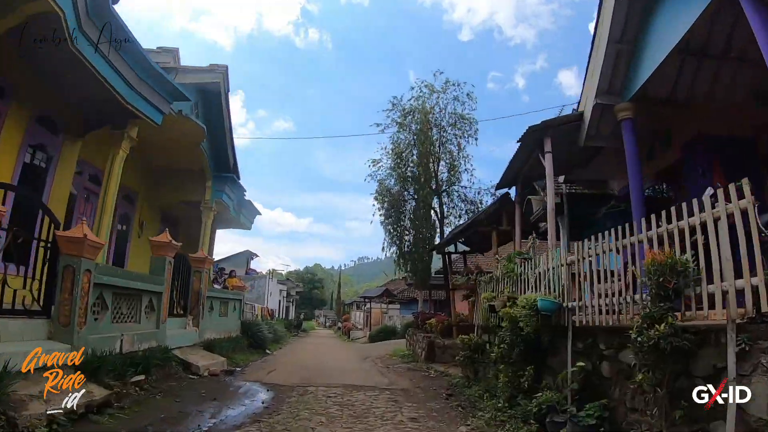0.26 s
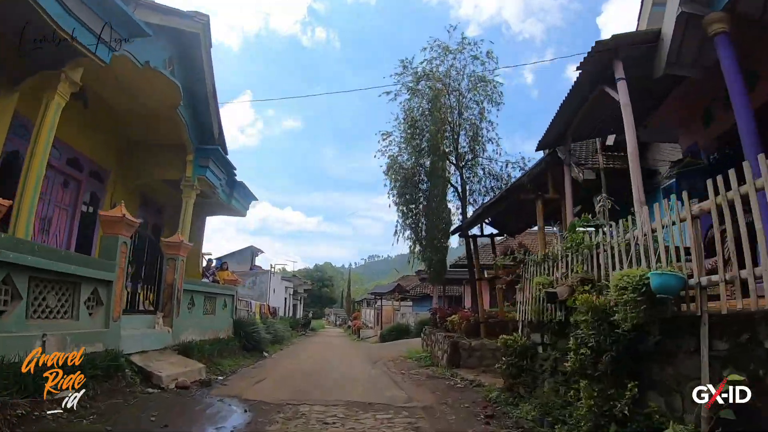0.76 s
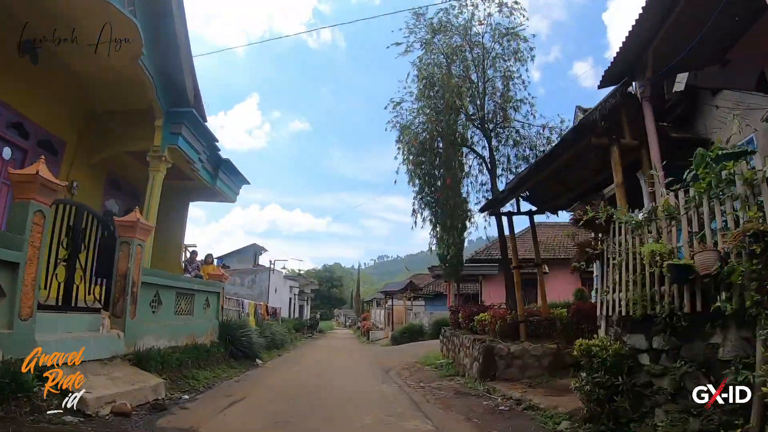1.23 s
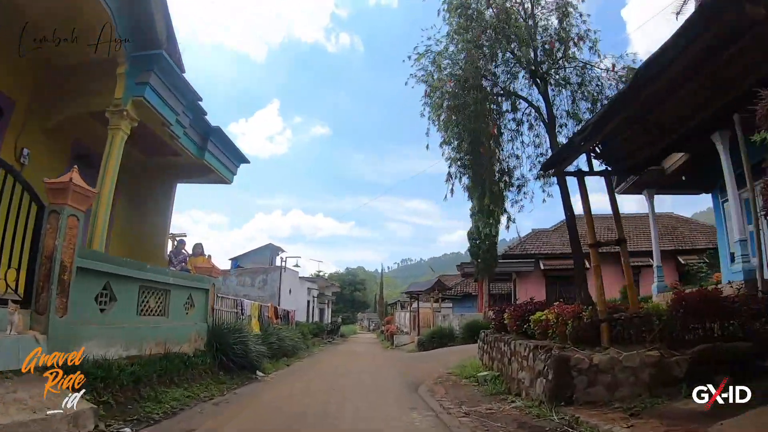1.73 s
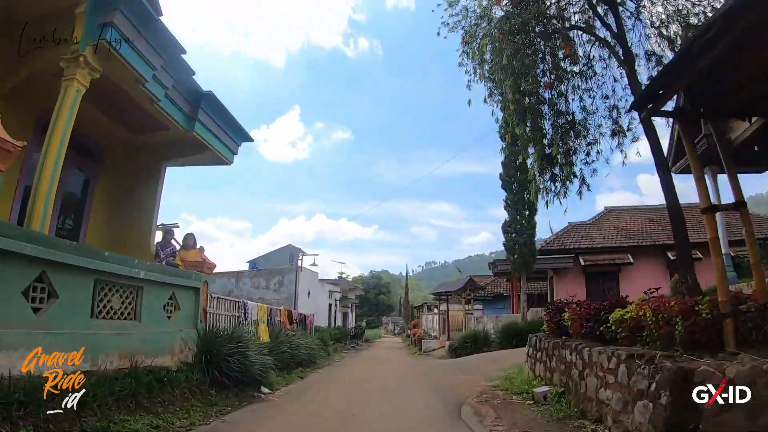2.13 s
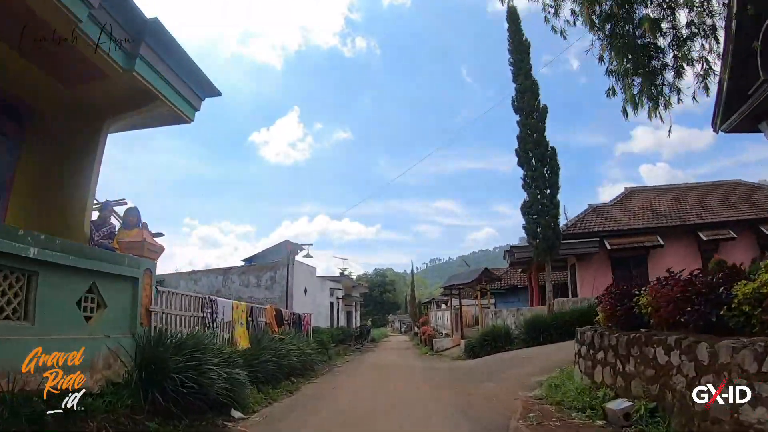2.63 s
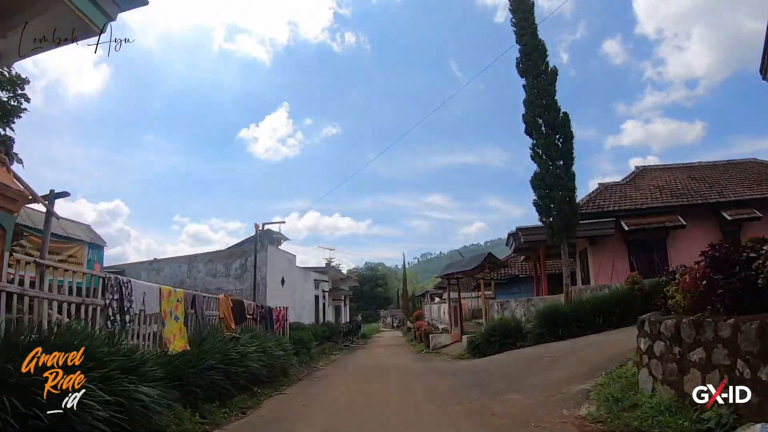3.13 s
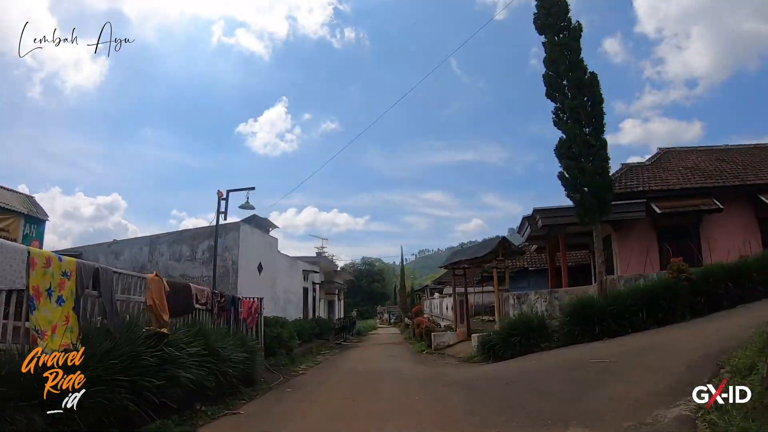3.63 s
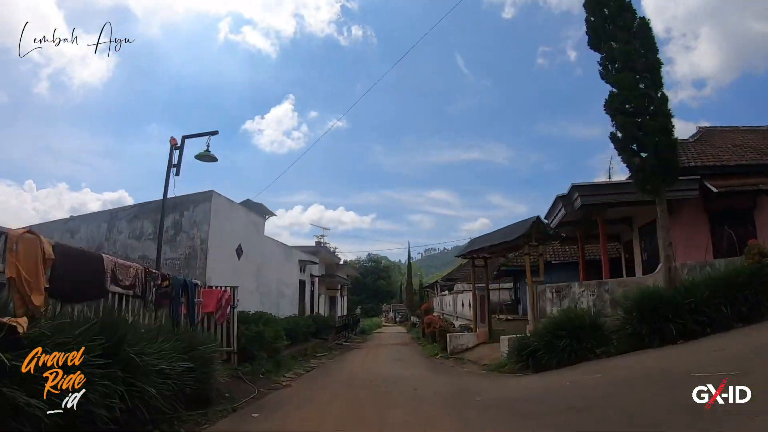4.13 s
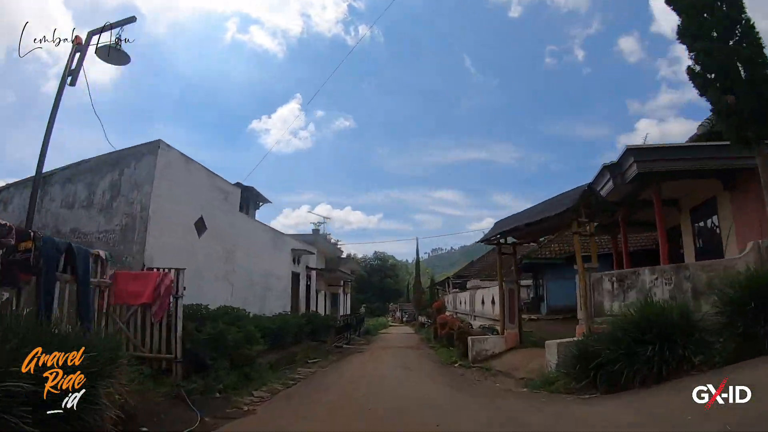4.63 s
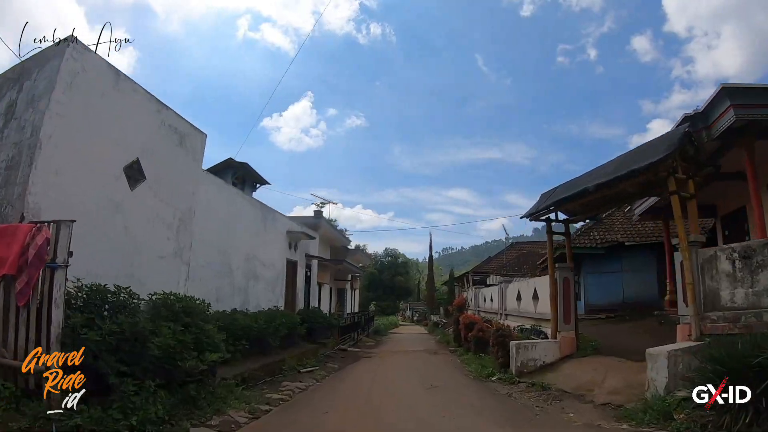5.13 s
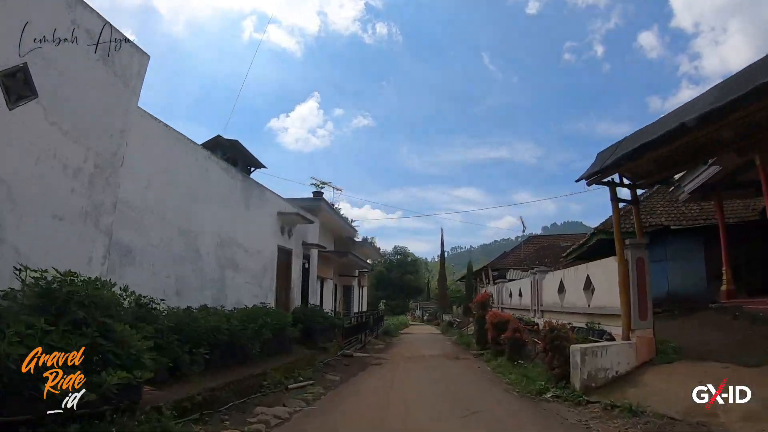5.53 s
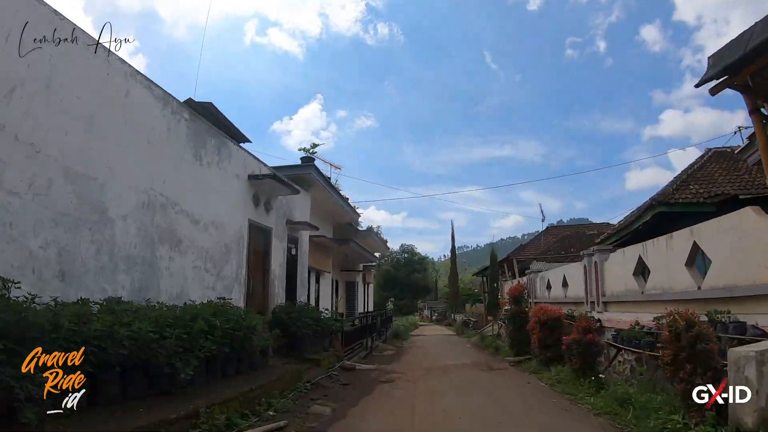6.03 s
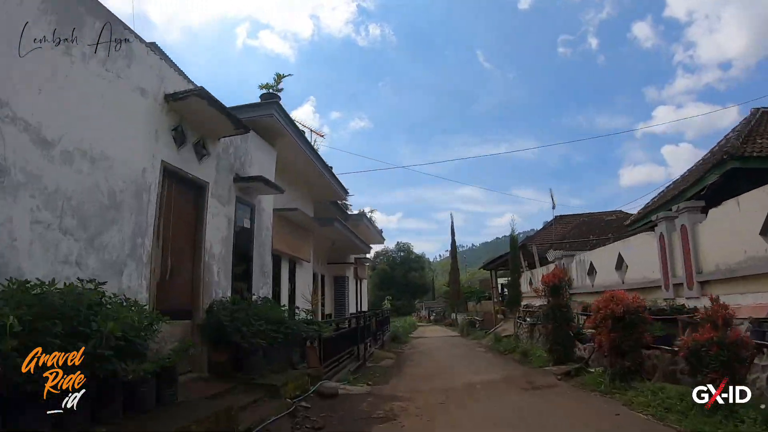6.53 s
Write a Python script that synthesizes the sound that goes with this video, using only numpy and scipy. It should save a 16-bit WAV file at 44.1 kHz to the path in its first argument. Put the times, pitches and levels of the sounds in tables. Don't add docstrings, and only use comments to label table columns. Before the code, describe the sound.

A bicycle coasts down a rough lane, wind and cobbles thumping the microphone, tyres roaring over grit while the freewheel ticks rapidly and buzzes.

```python
import sys
import numpy as np
from scipy import signal
from scipy.fft import rfft, irfft
from scipy.io import wavfile
from scipy.ndimage import uniform_filter1d

SR = 44100
rng = np.random.default_rng(int(sys.argv[2]) if len(sys.argv) > 2 else 0)


def master_out(mix):
    frames = np.transpose(np.atleast_2d(mix))
    ceiling = np.clip(frames, -1, 1)
    pcm = np.round(ceiling * 32767).astype(np.int16)
    wavfile.write(sys.argv[1], SR, pcm)


def volts_from_db(level):
    exponent = np.asarray(level, float) / 20
    return 10 ** exponent


N = 298998

# time_s, buffeting_db
WIND = [(0, -18.5), (.45, -13.5), (.8, -18.5), (1.15, -20.5), (1.55, -16), (2.1, -15.5), (2.5, -21),
        (2.8, -23), (3.4, -26), (3.8, -29.5), (4.3, -25), (4.5, -20.5), (4.8, -21.5), (5.1, -14.5),
        (5.5, -13.5), (5.85, -17.5), (6.2, -22.5), (6.78, -15.5)]
# freq_hz, density_db
BUFFET_SPECTRUM = [(3, -34), (8, 8), (25, -6), (76, 6), (120, -3), (135, -7.5), (165, -31), (250, -23.5),
                   (420, -30.5), (800, -57.5), (1500, -94)]
# freq_hz, gain_db
BUFFET_TONE = [(15, 1), (35, 5.5), (50, -0.15), (126, -0.2), (142, -2), (175, -4), (215, 3.3)]
# middle_s, half_length_s, thump_db, rattle_db
JOLTS = [(0.214, 0.061, 8, 5.5), (.31, 0.15, 7, 12), (0.525, 0.029, 6, 5), (0.659, 0.07, 10, 11.5),
         (0.773, 0.094, 4, 6.5), (1.012, 0.2, 10, 6.8), (1.301, 0.098, 12, 12.5), (1.391, 0.082, 7.5, 8.5),
         (1.666, 0.039, 4.5, -2.5), (1.686, 0.092, 5, 10.5), (1.854, 0.11, 2.8, 7.5),
         (1.924, 0.018, -0.5, 7.5), (1.993, .11, 3.5, 14.5), (2.181, 0.043, 5, 7.5),
         (2.287, 0.083, 1.7, 5.5), (2.542, 0.029, -1.5, -2), (2.87, 0.1, 6.5, .3), (4.042, 0.16, 0.5, 0.5),
         (4.7, .08, 3, -2.2), (5.267, 0.32, -5, 2), (5.955, 0.15, 8.5, 3.5), (6.092, 0.027, 14.5, 1.5),
         (6.358, 0.38, 7.5, 0), (6.747, 0.043, 5, 1.5)]

# pitch_hz, width_hz, level_db
DRONE_MODES = [
    (114.3, 9.3, 6.5),
    (91.9, 25, -5),
]
# start_s, length_s, level_db
BOUNCES = [(0.013, 0.11, -11), (0.262, 0.14, -13.5), (.62, .11, -15.5), (0.752, .13, -12.5),
           (1.207, .08, -14.5), (1.69, .07, -15.5), (1.846, .04, -15), (1.96, 0.035, -12),
           (2.065, .1, -15.5), (2.52, 0.03, -14), (2.693, 0.084, -13), (2.99, 0.081, -14.5),
           (3.14, .076, -14.5), (3.402, .044, -13), (3.542, .043, -15), (3.72, 0.11, -13.5),
           (4.015, .12, -10.5), (4.182, .11, -10), (4.397, 0.13, -12.5), (4.523, 0.073, -11),
           (4.664, 0.066, -12), (4.85, .12, -12.5), (5.022, .04, -15), (5.127, 0.11, -8.5),
           (5.307, 0.097, -4.5), (5.592, .084, -14), (5.745, 0.15, -15), (5.919, 0.13, -11.5),
           (6.493, .042, -13.5), (6.59, .1, -10)]
# freq_hz, gain_db
DRONE_TOP_CUT = [(124, -1.5), (138, 0), (160, -38.5), (300, -40)]

# time_s, roar_db, brightness_db
GROUND = [(0, -29, 6), (.45, -34, 5), (1.2, -34.5, 6.5), (1.55, -32, 0), (2.1, -32, 3.5), (2.62, -32, 1),
          (3.3, -29, 5), (3.9, -24, 6), (4.4, -25, 6.5), (5.05, -24.5, 5), (5.49, -24, 3),
          (6.2, -24.5, 3.5), (6.78, -25.5, 4)]
# freq_hz, density_db
ROAR_SPECTRUM = [(88, -60), (150, -10), (168, -17), (230, 7), (335, -4), (406, 4.5), (508, -4), (1000, -10),
                 (1110, -15), (1230, -8.5), (1320, -30.5), (1440, -10), (1700, -21), (2210, -20),
                 (3740, -120)]
# freq_hz, density_db
RATTLE_SPECTRUM = [(88, -28), (150, 2.5), (360, -6.5), (487, -4.5), (762, -23), (1010, -34), (1210, -9.5),
                   (1830, -16.5), (1960, -16), (3010, -17), (6490, -33.5), (8640, -37), (10700, -47.5),
                   (13900, -76), (22000, -120)]

# start_s, peak_db, pitch_hz, crack_db, ring_s
KNOCKS = [(0.199, -19, 444, -1, 0.02), (0.269, -20, 466, -3, 0.036), (0.533, -28, 600, 6, 0.04),
          (0.669, -21, 444, 2, 0.031), (0.686, -13.5, 700, -23, 0.031), (0.78, -20, 401, -18, 0.062),
          (1.252, -27, 495, -15, 0.04), (1.314, -10, 458, -11, 0.056), (1.353, -11.5, 522, -14, 0.066),
          (1.387, -14.5, 720, -17, 0.02), (1.693, -11, 480, -15, 0.03), (1.742, -16, 431, -19, 0.036),
          (1.92, -7, 438, -28, 0.027), (1.965, -14, 800, -22, 0.068), (2.012, -7.5, 440, -18, 0.043),
          (2.069, -22, 468, -2, 0.045), (2.179, -13.5, 552, -28, 0.049), (2.269, -22, 471, -2, 0.031),
          (2.299, -30, 425, -15, 0.041), (2.578, -32, 670, -14, 0.04), (2.598, -25, 484, -5, 0.053),
          (2.649, -39, 583, -4, 0.047), (2.821, -22, 1430, -16, 0.027), (6.082, -6, 704, -25, 0.025),
          (1.835, -13.5, 900, -17, 0.019),
    (5.547, -18, 1500, 4.5, 0.027),
    (5.9, -19, 1790, -15, 0.054),
    (5.945, -15, 1910, -12, 0.27),
]

# time_s, teeth_per_s
TOOTH_RATE = [(0.0, 44.9), (1.15, 46.02), (1.95, 45.92), (2.6, 44.28), (3.0, 49.57), (3.3, 47.78),
              (4.3, 53.01), (5.2, 60.79), (5.35, 68.64), (5.55, 63.79), (5.7, 61.61), (5.85, 62.46),
              (6.15, 60.61), (6.3, 65.41), (6.78, 66.67)]
# time_s, level_db, low_modes_lift_db
TICKING = [(0, -45, -2.5), (.5, -50, 0), (1.2, -49.5, 0), (2.1, -54, 0), (2.55, -51, -1), (2.95, -45, 1.5),
           (3.4, -42.5, 0), (3.8, -39.5, -1.5), (4.25, -38.5, -1), (4.7, -39, -1.8), (5.29, -40.5, 0),
           (5.6, -43.5, -0.3), (5.9, -42, 1), (6.2, -44, 2.2), (6.4, -41, 1), (6.78, -42, .6)]
WHEEL_HZ = [1228, 1443, 1853, 1975, 2368, 2580, 2790, 2890, 3172, 3630, 4020, 4350, 4622, 5186, 5528, 5765,
            6200, 7060, 7370, 7850, 8500, 9740, 10350]
# width_hz, level_db, road_hum_db (against the ticks)
WHEEL_MODES = [(46.5, -8, -14.5), (52, 1.5, -7), (51, -1, 5), (83, -9.5, 10.5), (60, -8.5, 6.5),
               (152, -11, 9), (163, -7.5, 2.5), (102, -2.5, -4), (38.3, -5, 5), (80, -15, 8),
               (77.5, -8.5, -6.5), (165, -11.5, -12), (30, -17, -11), (90, -19, 7), (109, -29.5, -15),
               (123, -11, -3), (270, -23.5, -14), (110, -13.5, -17), (187, -12, -4.5), (130, -15, -19),
               (344, -13.5, -4), (109, -17, -3), (500, -63, -7)]
# freq_hz, density_db
SNAP_SPECTRUM = [(300, -3.5), (800, -4), (2000, -15.5), (4300, -16), (4700, -27), (10500, -24.5),
                 (11500, -32.5), (14000, -36.5), (16500, -59)]

# freq_hz, gain_db
CAPSULE = [(10, -1.5), (10400, -0.5), (11100, -8.5), (13600, -5), (14800, -26), (17000, -35)]


def unit_rms(x):
    return x / np.sqrt(np.mean(x ** 2) + 1e-20)


def noise():
    return rng.standard_normal(N)


def curve(rows, order=1):
    rows = np.array(rows)
    return np.interp(np.arange(N) / SR, rows[:, 0], rows[:, order])


def colour(x, points):
    f, db = np.transpose(points)
    hz = np.fft.rfftfreq(N, 1 / SR)
    gain_db = np.interp(np.log(hz + 1), np.log(f + 1), db)
    return irfft(rfft(x) * volts_from_db(gain_db), N)


def resonate(x, hz, width):
    pole = np.exp(-np.pi * width / SR + 2j * np.pi * hz / SR)
    return 2 * signal.lfilter([1 - abs(pole)], [1, -pole], x).real


def flutter(seconds):
    span = max(int(seconds * SR), 2)
    return unit_rms(uniform_filter1d(uniform_filter1d(noise(), span), span))


def steadied(x, seconds, share):
    power = uniform_filter1d(x ** 2, int(seconds * SR))
    return unit_rms(x / (abs(power) + 1e-12) ** (share / 2))


def humps(middles, lengths, heights):
    out = np.zeros(N)
    for middle, length, height in zip(middles, lengths, heights):
        hump = height * np.hanning(max(round(length * SR), 2))
        first = round(middle * SR) - len(hump) // 2
        part = out[max(first, 0):first + len(hump)]
        part += hump[max(-first, 0):][:len(part)]
    return out


def jolt_thump_db():
    middle, half, thump_db, _ = np.transpose(JOLTS)
    return humps(middle, 2 * half, thump_db)


def jolt_rattle_db():
    middle, half, _, rattle_db = np.transpose(JOLTS)
    return humps(middle, 2 * half, rattle_db)


def buffeting():
    push = steadied(colour(noise(), BUFFET_SPECTRUM), 0.089, share=0.6)
    push *= volts_from_db(curve(WIND) + jolt_thump_db() + 3.0)
    return colour(push, BUFFET_TONE)


def bouncing(steady_db=-21, swell_s=0.038):
    start, length, db = np.transpose(BOUNCES)
    swells = humps(start + length / 2, length + 2 * swell_s, volts_from_db(2 * db))
    return np.sqrt(volts_from_db(2 * steady_db) + swells)


def tyre_drone():
    push = noise()
    drone = np.zeros(N)
    for hz, width, db in DRONE_MODES:
        drone += volts_from_db(db) * resonate(resonate(push, hz, width), hz, 0.86 * width)
    drone = steadied(drone, 0.075, share=0.76) * bouncing() * volts_from_db(2.5)
    return colour(drone, DRONE_TOP_CUT)


def rolling(grit_per_s=1600, grit_db=4.5, patchy_db=1.0):
    jolt_db = jolt_rattle_db()
    grain_gain = volts_from_db(grit_db * rng.exponential(1, N).clip(0, 3.5))
    grit = grain_gain * (rng.random(N) < grit_per_s / SR) * noise()
    tread = unit_rms(colour(unit_rms(grit) * 0.72 + noise(), ROAR_SPECTRUM))
    upper = colour(tread, [(380, -40), (560, 0)])
    bright_db = curve(GROUND, order=2) - 0.51 * jolt_db
    tread += (volts_from_db(bright_db) - 1) * upper
    roar = tread * volts_from_db(curve(GROUND) + jolt_db - 1.52 + patchy_db * flutter(0.0072))
    rattle = volts_from_db(3.54 * flutter(0.0043)) * noise()
    return roar + unit_rms(colour(rattle, RATTLE_SPECTRUM)) * volts_from_db(-35 + 0.73 * jolt_db)


def knocks(attack_s=0.00057, width_hz=420):
    out, t = np.zeros(N), np.arange(3000) / SR
    crack_band = signal.butter(4, [2200, 4400], "band", fs=SR, output="sos")
    dull = signal.butter(4, 1800, fs=SR, output="sos")
    for start, peak_db, hz, crack_db, ring_s in KNOCKS:
        decay = volts_from_db(-60 * t / ring_s)
        blow = rng.standard_normal(len(t)) * decay * np.minimum(t / attack_s, 1)
        low = signal.sosfilt(dull, resonate(blow, hz, width_hz))
        crack = signal.sosfilt(crack_band, blow)
        sound = low / abs(low).max() + volts_from_db(crack_db) * crack / abs(crack).max()
        part = out[round(start * SR):][:len(t)]
        part += volts_from_db(peak_db - 2) * sound[:len(part)]
    return out


def tooth_clock(first_tooth=0.49, early_s=0.0028):
    turned = first_tooth + np.cumsum(curve(TOOTH_RATE)) / SR
    tooth = np.roll(turned, -round(early_s * SR)).astype(int).clip(0)
    tooth = np.maximum.accumulate(tooth)
    starts = np.r_[0, np.flatnonzero(np.diff(tooth)) + 1]
    return tooth - tooth[0], starts


def pawl_ticks(which, starts, luck, jitter_s=0.0004, bounce_s=0.0021, even_db=0.8, strike_db=7):
    late_s = jitter_s * (2 + luck[which, 0]).clip(0)
    age_s = (np.arange(N) - starts[which]) / SR - late_s
    fall = age_s.clip(0) / bounce_s
    strike = unit_rms((fall >= 1) & (np.roll(fall, 1) < 1))
    strike = signal.sosfilt(signal.butter(4, 4800, fs=SR, output="sos"), strike)
    force = volts_from_db(even_db * luck[which, 1])
    chatter = force * unit_rms(fall * np.exp(-fall)) * noise()
    return chatter, chatter + force * volts_from_db(strike_db) * strike


def freewheel(snap_db=-4, hiss=0.8, mode_even_db=2.3, faintest_db=-52, wobble_db=0.7):
    which, starts = tooth_clock()
    luck = rng.standard_normal((len(starts), 2 + len(WHEEL_MODES)))
    luck[:, 2:] = unit_rms(uniform_filter1d(luck[:, 2:], size=9, axis=0))
    chatter, tick = pawl_ticks(which, starts, luck)
    hum = noise()
    low, high = np.zeros((2, N))
    for k, (hz, (width, db, hum_db)) in enumerate(zip(WHEEL_HZ, WHEEL_MODES)):
        drive = tick * volts_from_db(mode_even_db * luck[which, 2 + k]) + volts_from_db(hum_db) * hum
        ring = resonate(resonate(drive, hz, 0.82 * width), hz, 3.6 * width)
        group = low if k < 9 else high
        group += (-1) ** k * volts_from_db(db) * ring
    wheel = (low * volts_from_db(curve(TICKING, order=2)) + high) / np.std(low + high)
    snap = volts_from_db(snap_db) * unit_rms(colour(chatter + hiss * hum, SNAP_SPECTRUM))
    level_db = curve(TICKING).clip(faintest_db) + 0.21 * jolt_rattle_db()
    level_db += wobble_db * flutter(0.022) + 12.5
    return volts_from_db(level_db) * (snap + wheel)


def scene():
    return (buffeting() + tyre_drone() + rolling() + knocks() + freewheel())[None]


def band_limit(x):
    return signal.sosfilt(signal.butter(12, 15800, fs=SR, output="sos"), x)


def record(dry):
    heard = colour(dry[0], CAPSULE)[None]
    limited = np.clip(1.25 * np.tanh(heard / 1.25), -1, 1)
    return band_limit(limited)


dry = scene()
out = record(dry)
master_out(out)
```